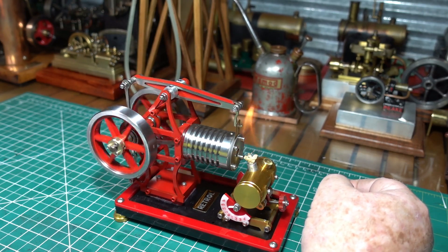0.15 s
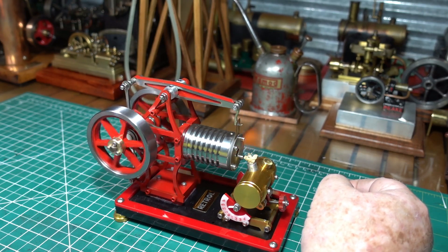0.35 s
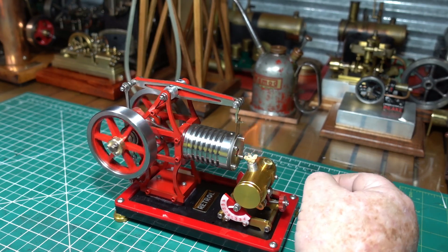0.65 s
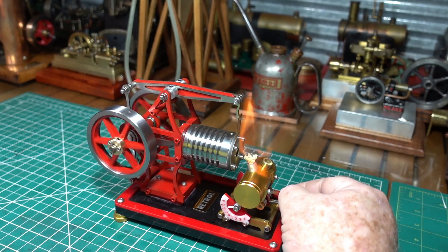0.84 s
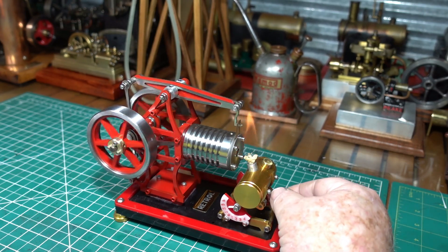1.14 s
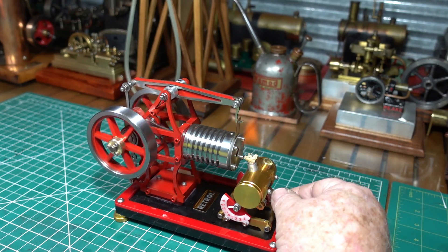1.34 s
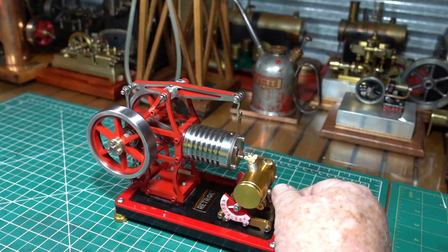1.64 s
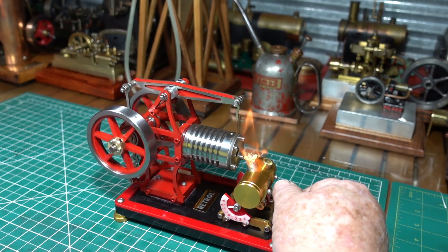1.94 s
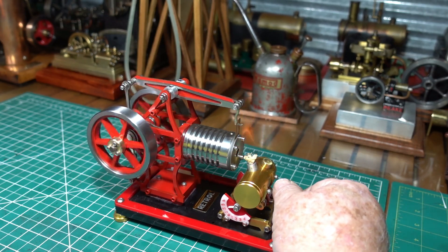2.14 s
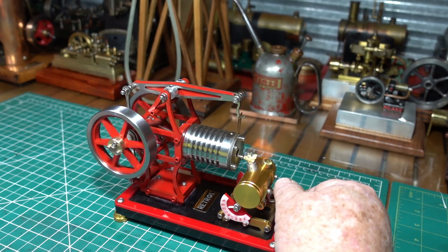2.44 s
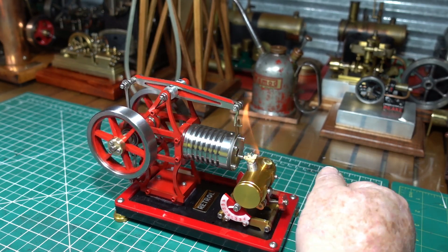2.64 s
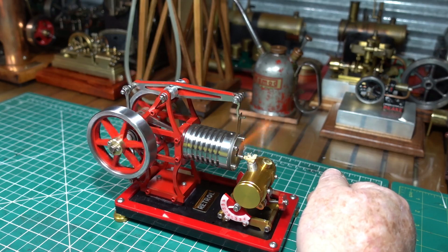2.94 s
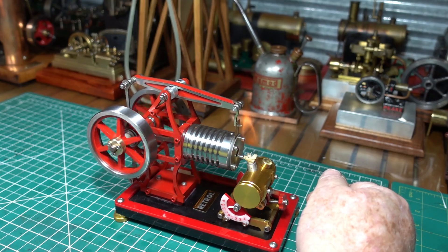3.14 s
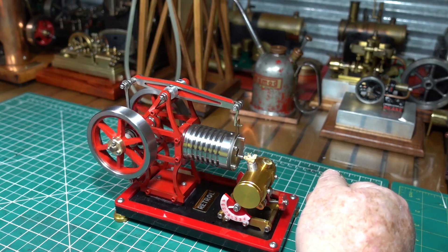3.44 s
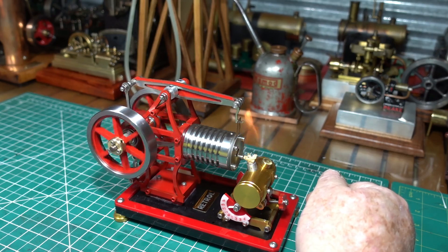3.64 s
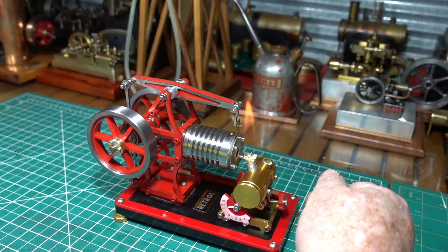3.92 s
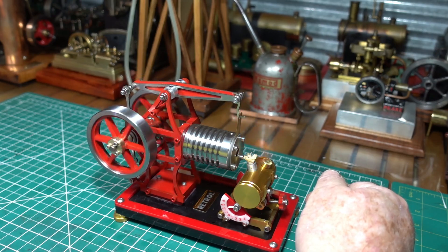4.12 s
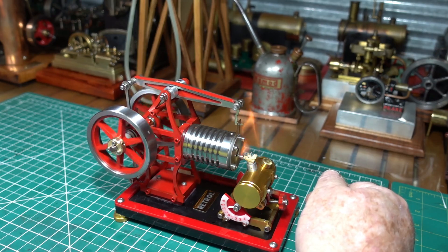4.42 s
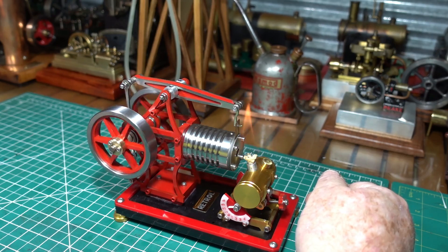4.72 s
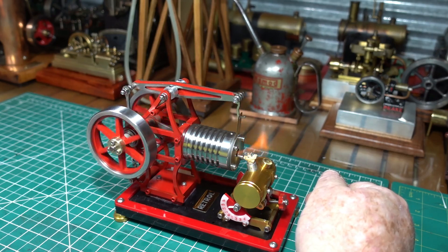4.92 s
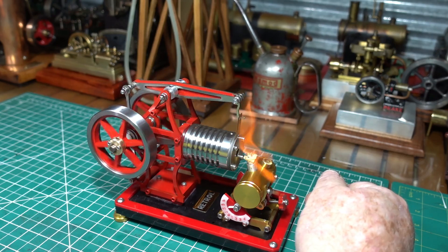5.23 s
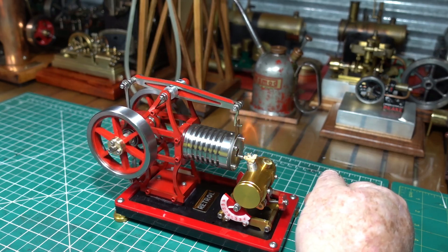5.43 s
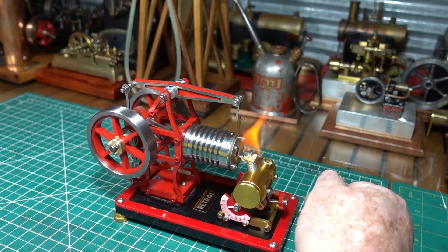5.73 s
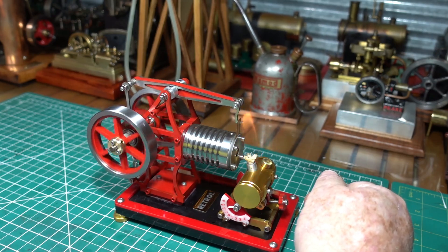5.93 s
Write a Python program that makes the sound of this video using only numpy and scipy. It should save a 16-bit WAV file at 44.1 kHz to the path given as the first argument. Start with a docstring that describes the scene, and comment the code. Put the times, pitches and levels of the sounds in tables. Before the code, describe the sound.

Steady clickety-clack of a small metal engine, heard very near: knock, clap, knock, clap, with gritty sliding friction swelling around every clap and thin high squeaks in the linkage. The beat gradually slackens and grows quieter over the first three seconds, then quickens modestly until the end. The tone is mid-bright and hard with little bass; the bench rings faintly, a short workshop echo widens the treble, and the room is otherwise hushed.

```python
"""A small flame-licker engine on a workshop bench mat, close to the microphone, over a faint hush of the room.
The piston rub comes first, as gritty noise following the crank; ticks, squeaks, the valve lift and a knock join it.
Then the valve claps shut, the cylinder gulps air, the valve rebounds and the rocker beam taps, once each turn.
Contacts are noise bursts, bodies are decaying tones; the frame and bench ring and a cluttered shop answers.
The engine slows down over the first half, then picks up again."""
import sys
import numpy as np
from scipy import signal
from scipy.fft import rfft, irfft, next_fast_len
from scipy.io import wavfile
from scipy.ndimage import uniform_filter1d, map_coordinates

SR = 44100
rng = np.random.default_rng(int(sys.argv[2]) if len(sys.argv) > 2 else 0)


def generate_wav(sig):
    """Save sig (samples, or channels by samples) to the path in sys.argv[1] as 16-bit PCM at SR."""
    pcm = np.round(np.clip(np.atleast_2d(sig).T, -1, 1) * 32767).astype(np.int16)
    wavfile.write(sys.argv[1], SR, pcm)


N = 267684

# Levels are those at the source, ahead of the frame, the shop and the final tone curve.
# noise of the room: pitch_hz, relative_db (per Hz)
ROOM_COLOUR = [(25, -35), (90, -12), (179, -9.5), (255, -10.5), (1090, -20), (2090, -3.5), (3300, -18),
               (15800, -67)]
# piston rub over one turn from the clap: angle_turns, low_db (under 5 kHz), high_db (over 5 kHz)
RUB_STROKE = [(.01, 5.5, 1), (0.03, 14.5, 12.5), (.12, 8.5, 1), (.27, 4, -3.5), (.46, 3, -1),
              (.62, 2, -4.5), (.8, -12, -10), (.91, -2.5, -8), (1, 9.5, -7)]
# colour of the piston rub: pitch_hz, relative_db (per Hz)
RUB_COLOUR = [(88, -45), (150, -15.5), (259, -11.5), (647, -5), (1140, 0), (1780, -7.5), (2170, 3.5),
              (2480, -5.5), (3070, -10), (4200, -10), (6570, -19.5), (15800, -25)]
# small ticks of play in the linkage: angle_turns, low_db (under 5 kHz), high_db (over 5 kHz)
PLAY_TICKS = [(.295, -50, -43), (.34, -33, -42), (.45, -33.5, -58), (.555, -31, -32.5), (.75, -41, -37.5),
              (.935, -36.5, -44.5)]
# colour of the rocker beam, the ticks and the first touch: pitch_hz, relative_db (per Hz)
ROCKER_COLOUR = [(1180, -15), (2000, -0.5), (2550, -7.5), (4670, 0.5), (5650, -11.5), (11200, -6.5),
                 (15800, -71)]
# gliding squeaks: start_s, level_db, pitch_hz (middle of the glide)
SQUEAKS = [(0.0486, -33.5, 4370), (0.234, -26.5, 4320), (0.3366, -37, 4080), (0.541, -22.5, 4250),
           (0.6499, -41, 3390), (0.866, -27, 4170), (0.9787, -37, 3330), (1.3327, -35, 3210),
           (1.704, -36, 3120), (2.1055, -40, 3140), (2.53, -39, 3150), (2.97, -41, 3150),
           (3.391, -39.5, 3150), (3.812, -38.5, 3150), (4.2233, -41, 3150), (4.8794, -34, 3800),
           (4.996, -40, 3160), (5.6177, -35, 4100), (5.7292, -39, 3330)]
# valve lifts: start_s, level_db
VALVE_LIFTS = [(0.0685, -27), (0.3663, -25.5), (0.6747, -29.5), (1.007, -27), (1.358, -28), (1.732, -34),
               (2.1378, -27), (2.5633, -28), (3.0022, -29.5), (3.4216, -29), (3.8418, -30), (4.2518, -29.5),
               (4.6352, -33.5), (5.025, -27.5), (5.3873, -29), (5.7564, -29.5)]
# colour of the lift: pitch_hz, relative_db (per Hz)
LIFT_COLOUR = [(880, -26), (1500, -17.5), (2180, 1.5), (3330, 0.5), (4180, -5), (6200, -2.5), (10900, -4.5),
               (15800, -16.5)]
# rod knocks at the reversal: start_s (first touch), level_db
ROD_KNOCKS = [(0.1057, -12.5), (0.4038, -13.5), (0.7188, -14.5), (1.05, -14), (1.4049, -17),
              (1.7833, -21.5), (2.189, -21), (2.614, -22), (3.052, -22.5), (3.4709, -21.5), (3.8908, -20.5),
              (4.2982, -23), (4.6829, -18.5), (5.0695, -18.5), (5.437, -17.5), (5.806, -17)]
# colour of the knock: pitch_hz, relative_db (per Hz)
KNOCK_COLOUR = [(120, -19), (200, -12.5), (1120, -4.5), (1790, 4.5), (2680, -8.5), (3340, -7.5),
                (5370, -12), (13400, -16.5), (15000, -2.5), (15800, -58.5)]
# pushes on the bench near each end of the stroke: angle_turns, level_db
BENCH_PUSHES = [(.015, -39), (.505, -36)]
# modes of the bench top: pitch_hz (settled), relative_db, t60_s
BENCH_MODES = [(230.3, -12, .5), (263.6, -3, .24)]
# modes of the steel pin rung by the knock: pitch_hz, relative_db, t60_s
PIN_MODES = [(14210, -8, .3), (14850, -5, .05), (15400, -6, .04)]
# modes of the rod and cylinder mount: pitch_hz, relative_db, t60_s
MOUNT_MODES = [(1421, -14, .09), (1529, -14, 0.11), (1665, -9, 0.084), (1802, -9.5, .08),
               (1889, -11.5, 0.073)]
# valve claps shut: start_s, level_db
VALVE_CLAPS = [(0.206, -13), (0.5116, -15), (0.8331, -14.5), (1.1781, -14.5), (1.543, -17.5), (1.9377, -16),
               (2.3613, -17), (2.8052, -19), (3.2234, -16.5), (3.6531, -15.5), (4.0642, -19),
               (4.4539, -16.5), (4.8424, -16), (5.2078, -16), (5.5784, -16.5), (5.9433, -14.5)]
# colour of the clap: pitch_hz, relative_db (per Hz)
CLAP_COLOUR = [(500, -39), (1100, -13), (1500, 3.5), (1920, 8.5), (3380, -3), (5200, -11.5), (13200, -13),
               (15800, -15.5)]
# modes of the valve plate and its arm: pitch_hz, relative_db, t60_s
PLATE_MODES = [(1500, -16, 0.12), (1653, -11, 0.06), (1825, -8, 0.075), (2190, -7, 0.018),
               (3262, 2.5, 0.01)]
# the cylinder gulps air: angle_turns, level_db
AIR_GULP = (.021, -24.5)
# modes of the air in port and cylinder: pitch_hz, relative_db, t60_s
PORT_MODES = [(349, -7.5, 0.064), (559, -2, 0.032), (740, -1.5, 0.021)]
# valve falls back: angle_turns, low_db (under 5 kHz), high_db (over 5 kHz)
VALVE_REBOUND = (0.0396, -16.5, -26)
# colour of the rebound: pitch_hz, relative_db (per Hz)
REBOUND_COLOUR = [(120, -19), (200, -23.5), (610, -6), (1340, -14), (1670, 4.5), (2630, -10), (4080, -6.5),
                  (7330, -19), (13200, -8), (15800, -12)]
# rocker beam takes up its play: angle_turns, low_db (under 5 kHz), high_db (over 5 kHz)
ROCKER_TAP = (.1835, -22, -32)
# resonances of frame and bench: pitch_hz, width_hz, relative_db
FRAME_MODES = [(270, 35.4, 6.5), (563, 10, -12), (1114, 16, -3), (1675, 62, -9), (1970, 560, -15.5),
               (3307, 340, -2), (4120, 83, -5.5)]
# decay of the workshop's echo: pitch_hz, t60_s
SHOP_DECAY = [(200, 0.48), (2500, 0.27), (15000, 0.2)]
# stereo width, gain on the side signal: pitch_hz, side_db
SIDE_GAIN = [(60, -14), (150, -42), (380, -24), (950, -11.5), (2380, -7.5), (5980, -2.5), (15000, -1)]

SPLIT_HZ, TOP_HZ = 5000, 16990  # between lower and upper part; band limit
LIFT_TREBLE_DB, KNOCK_TREBLE_DB, CLAP_TREBLE_DB = -2.5, -12, -8.5  # over 5 kHz, against level_db
CRUISE_TURNS_PER_S = 2.7
CONTACT_GROWS, RUB_GROWS = 1.33, 1.5  # dB of sound per dB of speed
RUB_DB = -45  # at cruising speed, before the stroke's own dB
SCATTER_DB, PLAY_SCATTER_DB = 1.2, 3.5  # turn-to-turn chance
KNOCK_LAG_S = .003  # from the first touch to the blow
TIME = np.arange(N) / SR


def amp(db):
    """dB to gain."""
    return 10 ** (np.asarray(db) / 20)


def along(points, hz):
    """Read a curve of (pitch_hz, value) points on a log axis."""
    point_hz, value = np.transpose(points)
    return np.interp(np.log(hz + 1), np.log(point_hz + 1), value)


def filtered(x, response):
    """Multiply the spectrum of x by a response of frequency."""
    size = next_fast_len(N + SR // 2)
    hz = np.fft.rfftfreq(size, 1 / SR)
    return irfft(rfft(x, size) * response(hz), size)[..., :N]


def coloured(x, colour):
    """One row takes the colour whole; two rows take its lower and upper part; white noise keeps rms 1."""
    def response(hz):
        gain = amp(along(colour, hz))[None]
        if len(x) == 2:
            upper = 1 / (1 + (SPLIT_HZ / (hz + 1)) ** 8)
            gain = gain * np.sqrt([1 - upper, upper])
        return gain / np.sqrt(np.mean(gain ** 2, axis=1, keepdims=True))
    return filtered(x, response).sum(axis=0)


def grit(rate, spread_db):
    """Many small contacts: noise of rms 1, its level redrawn rate times a second and joined smoothly."""
    knots = rng.standard_normal(int(N * rate / SR) + 4)
    level_db = spread_db * map_coordinates(knots, [TIME * rate])
    x = rng.standard_normal(N) * amp(level_db)
    return x / x.std()


def patchy(x, depth_db):
    """Wandering colour of a rub: random gain in patches a few hundred Hz wide and some 20 ms long."""
    z = signal.stft(x, nperseg=256)[2]
    field = uniform_filter1d(rng.standard_normal(z.shape), size=3, axis=0)
    field = uniform_filter1d(field, size=6, axis=1)
    return signal.istft(z * amp(depth_db * field / field.std()), nperseg=256)[1][:N]


def crank():
    """Times of each half turn: the clap marks angle 0, the knock half a turn later."""
    clap, knock = np.transpose(VALVE_CLAPS)[0], np.transpose(ROD_KNOCKS)[0]
    before = knock[0] - (knock[1] - clap[0])
    after = clap[-1] + knock[-1] - clap[-2]
    return np.r_[before, np.sort(np.r_[clap, knock]), after]


def speed_db(s):
    """Shaft speed over the cruising speed in dB, from the time each full turn takes."""
    marks = crank()
    turns_per_s = 1 / (marks[2:] - marks[:-2])
    return np.interp(s, marks[1:-1], 20 * np.log10(turns_per_s / CRUISE_TURNS_PER_S))


def each_turn(angle, *levels_db, scatter_db=SCATTER_DB):
    """One contact a turn at a crank angle, louder at speed: rows of start_s and levels."""
    marks = crank()
    half_turns = 2 * (np.arange(len(marks) // 2) + angle)
    s = np.interp(half_turns, np.arange(len(marks)), marks, right=-1)
    change_db = CONTACT_GROWS * speed_db(s) + scatter_db * rng.standard_normal(len(s))
    return np.c_[s, change_db[:, None] + levels_db][s >= 0]


def banded(table, treble_db):
    """Rows of start_s, low_db, high_db from rows of start_s, level_db."""
    return [(s, db, db + treble_db) for s, db in table]


def contacts(table, colour, gain_db, rise, t60, tail_db, tail_t60):
    """A quick rise, a short crack and a gritty chatter of noise; pairs are (lower, upper) part, times in s."""
    def column(pair):
        return np.reshape(pair, (-1, 1))
    crack, chatter = np.zeros((2, N + SR)), np.zeros((2, N + SR))
    t = np.arange(SR // 3) / SR
    for s, *db in table:
        at = round(s * SR)
        start = amp(column(db) + column(gain_db)) * (1 - np.exp(-t / column(rise)))
        crack[:, at:at + len(t)] += start * amp(-60 * t / column(t60))
        chatter[:, at:at + len(t)] += start * amp(column(tail_db) - 60 * t / column(tail_t60))
    smooth = rng.standard_normal((2, N))
    rough = [grit(rate=500, spread_db=5.0) for _ in range(2)]  # separate little impacts
    return coloured(crack[:, :N] * smooth + chatter[:, :N] * rough, colour)


def ringing(table, modes, column, delay, rise, bend=0):
    """Every blow rings decaying modes at new strengths; a mount stiffening under load starts sharp by bend."""
    out, t = np.zeros(N + SR), np.arange(SR // 3) / SR
    chance_db = 2 * rng.standard_normal((len(table), len(modes)))
    bent_time = np.cumsum(1 + bend * np.exp(-t / 0.0491)) / SR
    for row, scatter_db in zip(table, chance_db):
        ring = np.zeros(len(t))
        for (hz, db, t60), extra_db in zip(modes, scatter_db):
            ring += amp(db + extra_db - 60 * t / t60) * np.sin(2 * np.pi * hz * bent_time)
        at = round((row[0] + delay) * SR)
        out[at:at + len(t)] += amp(row[column]) * ring * (1 - np.exp(-t / rise))
    return out[:N]


def room_hush():
    """Faint steady coloured noise of the room, unrelated in mid and side."""
    return amp(-52.5) * np.array([coloured(rng.standard_normal((1, N)), ROOM_COLOUR) for _ in range(2)])


def piston_rub():
    """Sliding friction: gritty noise that follows the crank angle and grows with speed."""
    marks = crank()
    angle = np.interp(TIME, marks, np.arange(len(marks)) / 2) % 1
    stroke_angle, low_db, high_db = np.transpose(RUB_STROKE)
    effort_db = RUB_DB + RUB_GROWS * speed_db(TIME)
    low = amp(effort_db + np.interp(angle, stroke_angle, low_db)) * grit(rate=120, spread_db=2.0)
    high = amp(effort_db + np.interp(angle, stroke_angle, high_db)) * grit(rate=300, spread_db=1.5)
    return patchy(coloured(np.array([low, high]), RUB_COLOUR), depth_db=3)


def play_ticks():
    """The linkage takes up its play in small ticks of noise at set crank angles."""
    ticks = np.vstack([each_turn(*row, scatter_db=PLAY_SCATTER_DB) for row in PLAY_TICKS])
    return contacts(ticks, ROCKER_COLOUR, gain_db=(-3, 1.5), rise=(.0006, .0003), t60=(.03, .015),
                    tail_db=(-16, -16), tail_t60=(.1, .1))


def squeaks(length, glide, rough):
    """Rough little whistling tones that slide upward, rising fast and fading slower."""
    out, u = np.zeros(N + SR), np.arange(round(length * SR)) / (length * SR)
    flutter = uniform_filter1d(rng.standard_normal(N + SR), size=50) * np.sqrt(50)
    for s, db, hz in SQUEAKS:
        tone = np.sin(2 * np.pi * np.cumsum(hz * (1 + glide * (u - .5))) / SR)
        at = round(s * SR)
        out[at:at + len(u)] += amp(db) * np.sin(np.pi * np.sqrt(u)) * tone
    return (out * (1 + rough * flutter))[:N]


def valve_lift():
    """The valve lifts off with a light, bright burst of contact noise."""
    return contacts(banded(VALVE_LIFTS, LIFT_TREBLE_DB), LIFT_COLOUR, gain_db=(-1.5, 6), rise=(.0006, .0003),
                    t60=(.03, .03), tail_db=(-14, -11), tail_t60=(.1, .12))


def rod_knock():
    """The rod knocks at the reversal: a light first touch, then the blow."""
    touches = banded(ROD_KNOCKS, KNOCK_TREBLE_DB)
    touch = contacts(touches, ROCKER_COLOUR, gain_db=(-8, -8), rise=(.0004, .0004), t60=(.03, .02),
                     tail_db=(-20, -20), tail_t60=(.1, .1))
    blow = contacts(np.add(touches, [KNOCK_LAG_S, 0, 0]), KNOCK_COLOUR, gain_db=(-6, 3), rise=(.0012, .0018),
                    t60=(.08, .06), tail_db=(-9, -9), tail_t60=(.25, .2))
    return touch + blow


def bench_push():
    """The stroke's ends push the bench top, whose low modes start sharp and settle."""
    pushes = np.vstack([each_turn(*row) for row in BENCH_PUSHES])
    return ringing(pushes, BENCH_MODES, column=1, delay=0, rise=0.013, bend=0.04)


def steel_pin():
    """The treble of the knock rings very high modes of a steel pin."""
    return ringing(banded(ROD_KNOCKS, KNOCK_TREBLE_DB), PIN_MODES, column=2, delay=.004, rise=0.00048)


def rod_and_mount():
    """The knock rings the rod and the cylinder mount."""
    return amp(-4.5) * ringing(ROD_KNOCKS, MOUNT_MODES, column=1, delay=.004, rise=0.0016)


def valve_clap():
    """The valve claps shut: a hard crack with a gritty chatter after it."""
    return contacts(banded(VALVE_CLAPS, CLAP_TREBLE_DB), CLAP_COLOUR, gain_db=(-6, 4), rise=(.0004, .0003),
                    t60=(.04, .02), tail_db=(-9, -10), tail_t60=(.2, .12))


def valve_plate():
    """The clap rings the valve plate and its arm."""
    return amp(-0.5) * ringing(VALVE_CLAPS, PLATE_MODES, column=1, delay=.0003, rise=0.00042)


def air_gulp():
    """A low pop of air per turn in port and cylinder, turned over so it starts with an inward pull."""
    return -ringing(each_turn(*AIR_GULP), PORT_MODES, column=1, delay=.0011, rise=0.00029)


def valve_rebound():
    """The valve falls back shortly after the clap with a softer-edged contact."""
    return contacts(each_turn(*VALVE_REBOUND), REBOUND_COLOUR, gain_db=(-6, 3), rise=(.0011, .0006),
                    t60=(.03, .03), tail_db=(-5, -6), tail_t60=(.25, .2))


def rocker_tap():
    """The rocker beam takes up its play in one short contact a turn."""
    return contacts(each_turn(*ROCKER_TAP), ROCKER_COLOUR, gain_db=(-1, 1.5), rise=(.0006, .0004),
                    t60=(.03, .02), tail_db=(-14, -14), tail_t60=(.1, .1))


def frame(x, ring_db):
    """The frame and bench lift what lies on their modes: resonances added to the direct sound."""
    def response(hz):
        total = 0.7
        for mode_hz, width_hz, db in FRAME_MODES:
            damping = 1j * hz * width_hz
            total = total + amp(db + ring_db) * damping / (mode_hz ** 2 - hz ** 2 + damping)
        return total
    return filtered(x, response)


def shop(x):
    """Workshop echo: two unrelated noise tails, each frequency dying at its own speed."""
    hz, t, z = signal.stft(rng.standard_normal((2, SR // 2)), SR, nperseg=128)
    decay = amp(-60 * t / along(SHOP_DECAY, hz)[:, None])
    tail = signal.istft(z * decay, SR, nperseg=128)[1]
    return signal.fftconvolve(x[None], tail / np.linalg.norm(tail[0]), axes=1)[:, :N]


def scattered(x):
    """The same sound with unrelated phases, as near clutter sends it to the two channels."""
    z = signal.stft(x, nperseg=128)[2]
    phase = 2 * np.pi * rng.random(z.shape)
    return signal.istft(z * np.exp(1j * phase), nperseg=128)[1][:N]


def scene():
    """Engine in the middle; echoes and near scatter widen the treble."""
    hush_mid, hush_side = room_hush()
    clicks = play_ticks() + valve_lift() + rod_knock() + valve_clap() + valve_rebound() + rocker_tap()
    engine = frame(piston_rub() + clicks, ring_db=0.5)
    engine = engine + squeaks(length=0.0227, glide=0.072, rough=0.56)  # length in s, glide as a share
    engine = engine + bench_push() + steel_pin() + rod_and_mount() + valve_plate() + air_gulp()
    echo_mid, echo_side = shop(engine)
    mid = engine + amp(-9.5) * echo_mid + hush_mid
    around = amp(-0.5) * scattered(engine) + amp(-6) * echo_side + hush_side
    side = filtered(around, lambda hz: amp(along(SIDE_GAIN, hz)))
    return np.array([mid + side, mid - side])


def record(dry):
    """The bass is thinned and the sound ends near 16 kHz; nothing stays above the band limit."""
    curve = [(30, -25), (70, -18.5), (190, -8.5), (225, 0),
             (15700, -2.5), (16100, -26), (16900, -34)]  # pitch_hz, gain_db
    return filtered(dry, lambda hz: amp(along(curve, hz)) * (hz < TOP_HZ))


dry = scene()
out = record(dry)
generate_wav(out)
```